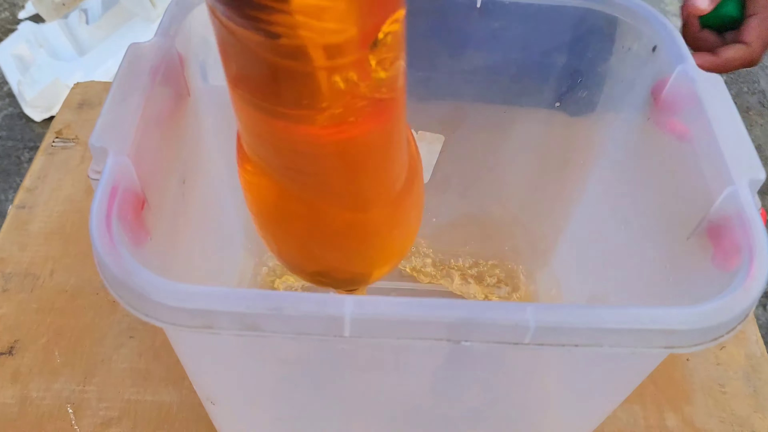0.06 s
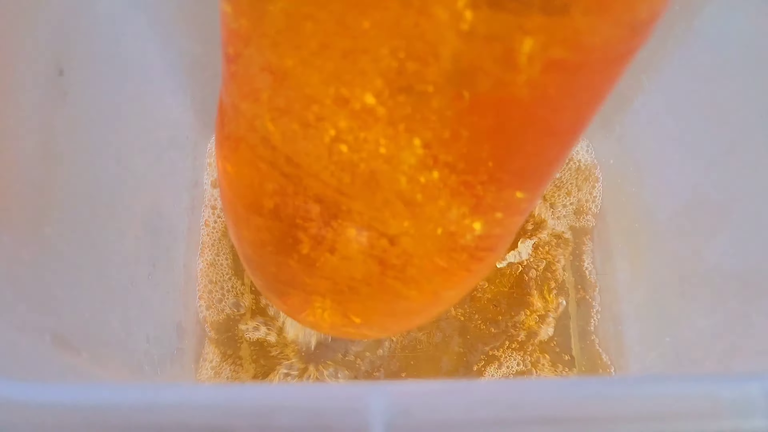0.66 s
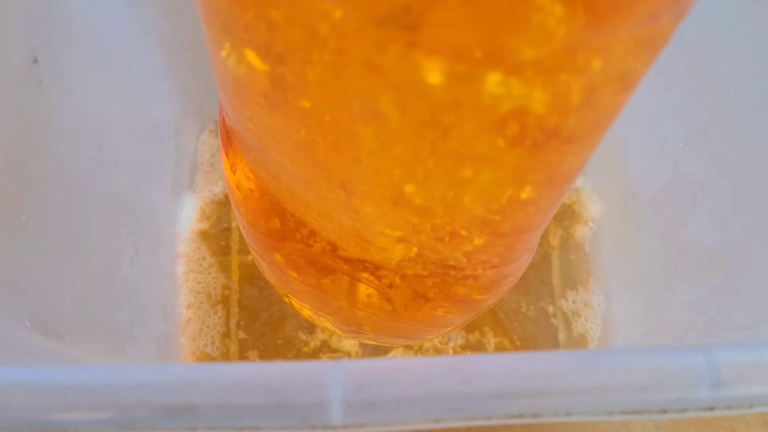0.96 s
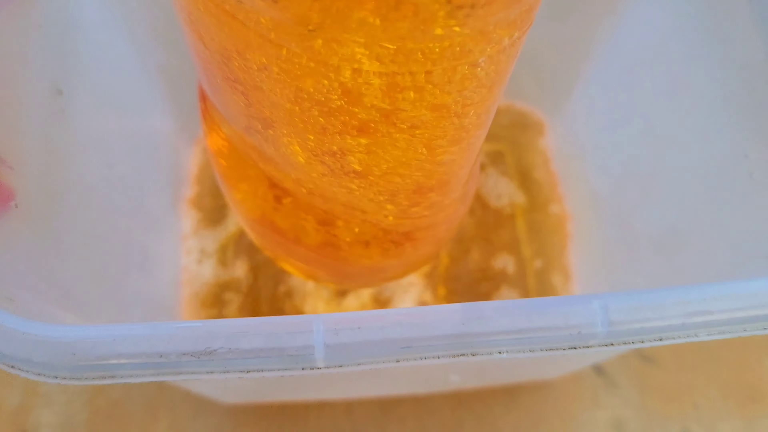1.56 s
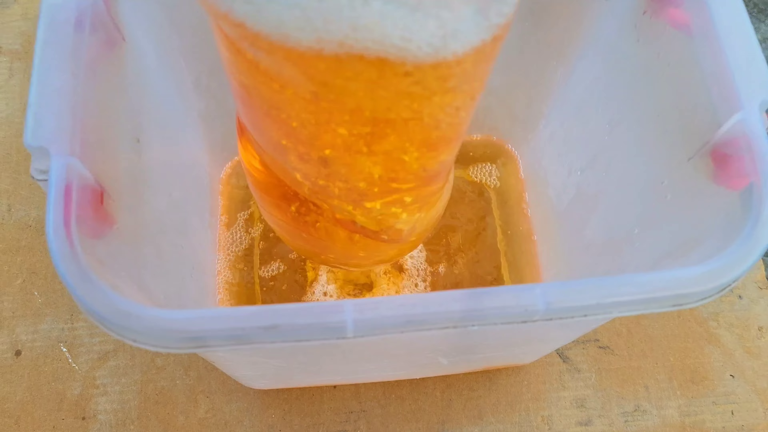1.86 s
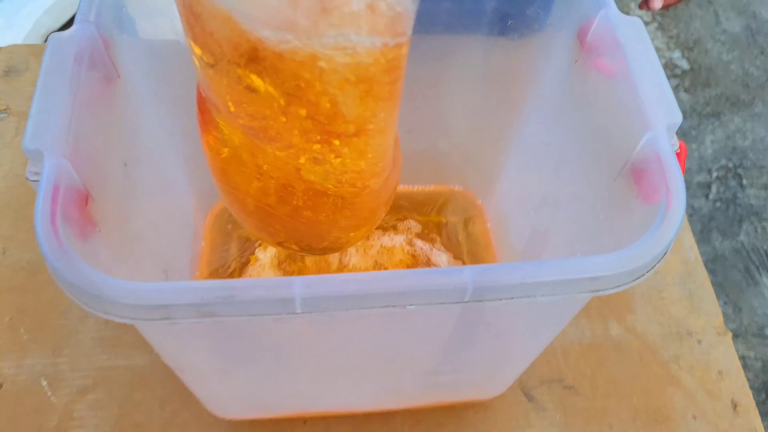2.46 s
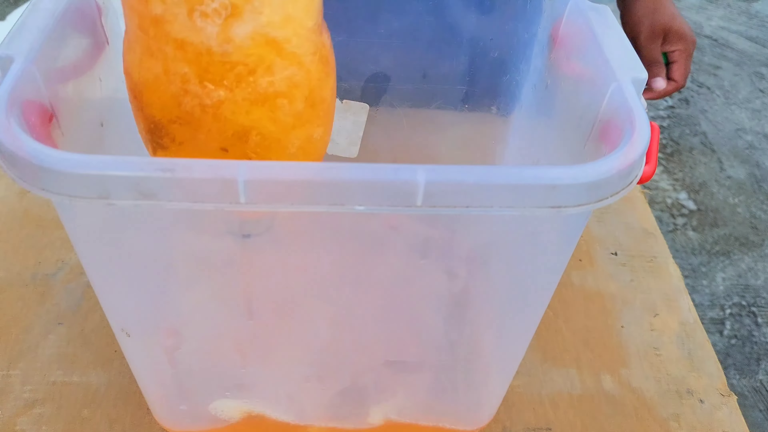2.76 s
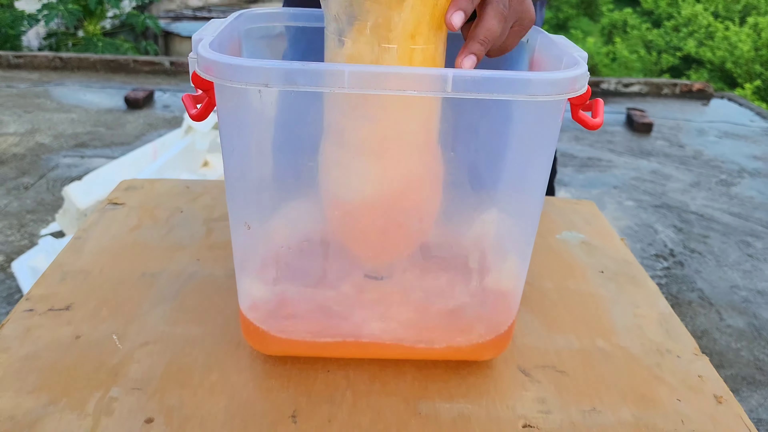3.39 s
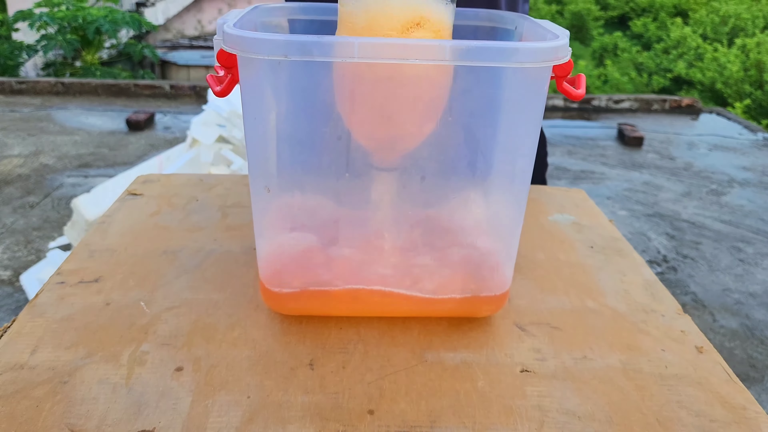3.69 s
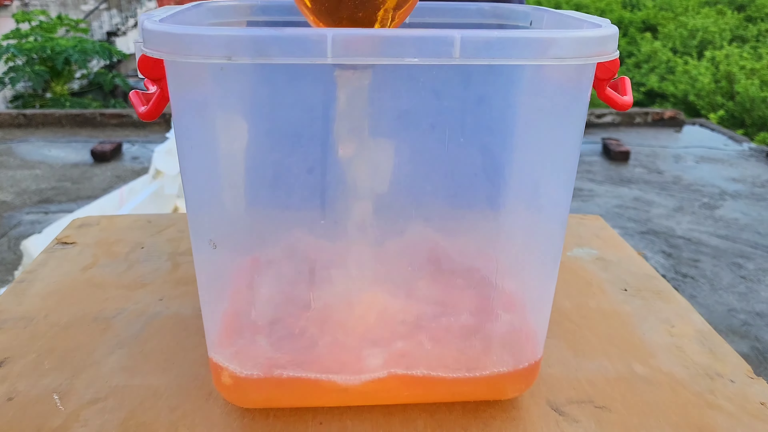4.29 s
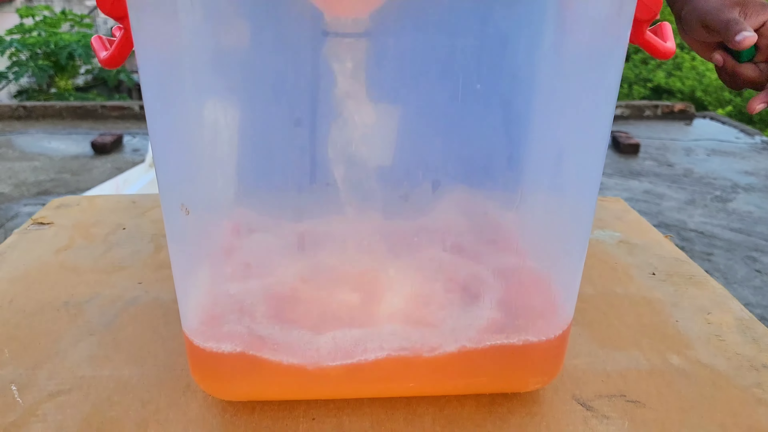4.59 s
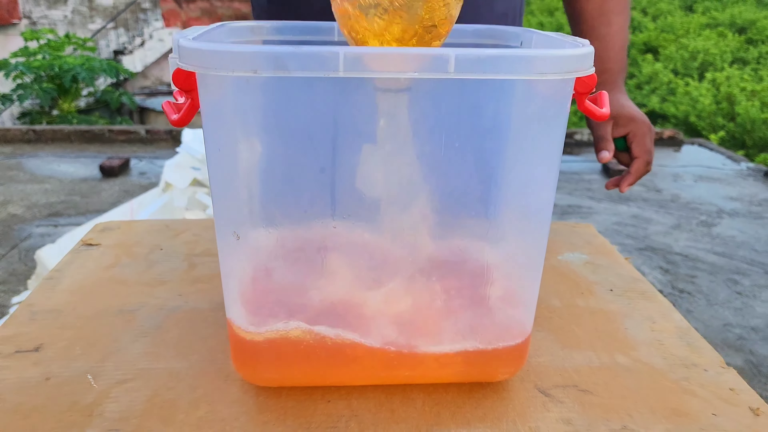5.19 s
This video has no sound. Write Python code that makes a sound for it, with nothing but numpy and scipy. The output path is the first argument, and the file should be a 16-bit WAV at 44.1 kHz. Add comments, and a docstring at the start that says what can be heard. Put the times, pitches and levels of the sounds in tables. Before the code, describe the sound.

Fingers rub, scrape and knock on the microphone while water pours quietly from a bottle into a plastic tub outdoors.

```python
"""On a flat roof, water pours from a plastic bottle into a plastic tub: drops splash and trapped air rings.
From the first moments a hand, much closer, rubs, scrapes and knocks on the plastic microphone case.
Friction and impact excite the case's damped modes, and the hardest knocks overload the input.
After three seconds the rubbing dies away; a few last knocks fall among the whistles of far birds.
The quiet pour remains, over the light breeze and far insects that have sounded throughout."""
import sys
import numpy as np
from scipy import signal
from scipy.fft import rfft, irfft, next_fast_len
from scipy.io import wavfile

SR = 44100
rng = np.random.default_rng(int(sys.argv[2]) if len(sys.argv) > 2 else 0)


def dump(signal):
    """Clip the signal to [-1, 1] and save it as 16-bit WAV at the path in sys.argv[1]."""
    limited = np.clip(np.atleast_2d(signal).T, -1, 1)
    pcm = np.round(limited * 32767).astype(np.int16)
    wavfile.write(sys.argv[1], SR, pcm)


N = 235670

# firm presses on the case: t/s, level/dB, f/Hz
PRESSES = [(0.253, -13.5, 110), (0.4992, -13.5, 126), (0.585, -4.5, 162), (0.658, -10, 287),
           (0.6737, -1, 240), (1.4484, -4.5, 233), (1.5866, -12, 315), (1.698, -12, 288),
           (1.7899, -9.5, 149), (1.8395, -15, 305), (2.0874, -20.5, 293), (2.187, -5, 188),
           (2.3655, -7, 315), (2.3964, -10.5, 190), (2.51, -0.5, 141), (2.5475, -1, 188), (2.6446, -8, 186),
           (2.656, -12, 203), (2.769, 2.5, 179), (2.917, -6.5, 181), (2.9743, -18, 144),
           (3.0484, -8.5, 222), (3.1319, -18.5, 147), (3.207, -24, 285), (3.2564, -22, 226),
           (3.5867, -8, 234), (3.771, -30.5, 308), (4.3032, -9.5, 200)]
# hard contacts: t/s, relative level/dB, tilt per band/dB, relative note level/dB, note f/Hz, left-right/dB
CONTACTS = [(0.157, -26, -8, -10, 563, 0.5), (0.577, -12.5, -0.5, -6, 783, 2.5),
            (0.67, -23.5, -6, -3, 602, 3.5), (0.697, -35, -4, -7.5, 745, 7),
            (0.791, -31, -1.5, -6.5, 3470, 2), (1.029, -31, 9.5, -18, 650, 4),
            (1.797, -9, 0.5, 3, 957, 0.5), (2.19, -23, -0.5, -16, 1780, 1),
            (2.353, -14, 6.5, -1.5, 400, 1.5), (2.51, -27, -2.5, 0.5, 748, 2.5),
            (2.554, -12.5, 1, 5, 476, 2), (2.656, -9.5, 1.3, -15, 2065, 9),
            (2.768, -17, -2.5, -9.5, 770, 1), (2.866, -20, -4, -8.5, 600, 4.5),
            (2.913, -13.5, -3, -4, 895, 1), (2.923, -22, 7.5, -16, 3940, 7.5),
            (3.048, -15.5, -3, -11, 464, 0.5), (3.109, -30, -7.5, -10.5, 533, 3),
            (3.553, -9, -1, 2.5, 900, -2.5), (3.586, -15.5, -1, -6, 1650, -2),
            (4.304, -5, 2.5, 2.5, 1470, -1.5)]
# ring of the case: f/Hz, relative density/dB
CASE_SPECTRUM = [(200, 7), (350, 1), (520, -1.5), (700, -2), (1000, 1), (1500, 11.5), (2200, 4.5),
                 (3200, 3), (4400, 4.5), (5500, -3), (7400, -7.5), (9500, -18), (12000, -26.5),
                 (15500, -31)]
# finger slips: t/s, relative level/dB, length/s, squeak f/Hz
FINGER_SLIPS = [(0.258, -25, 0.0043, 580), (0.319, -25, 0.01, 720), (1.0665, -18.5, 0.0027, 1230),
                (1.104, -23, 0.014, 1284), (1.141, -20, 0.016, 1223), (1.166, -25.5, 0.017, 750),
                (1.289, -21, 0.011, 280), (1.319, -23, 0.017, 1213), (1.354, -24.5, 0.0086, 1560),
                (1.363, -18.5, 0.0059, 2114), (1.539, -26.5, 0.0064, 1280), (1.563, -26, 0.0092, 1180),
                (1.586, -19, 0.0077, 1220), (1.846, -28, 0.0091, 1116)]
# resonances that the slips excite: f/Hz, nominal width/Hz, gain/dB
RASP_MODES = [(314, 140, 2.5), (724, 48, 4), (1236, 43, 7.5), (1880, 690, -7)]
# rumble and hiss of the rub: f/Hz, relative density/dB
RUMBLE_SPECTRUM = [(30, -32), (60, -3.5), (120, 2), (300, 1), (480, -11.5), (800, -5.5), (1500, -19.5),
                   (3000, -37)]
HISS_SPECTRUM = [(590, -20), (1000, -25), (1160, -7.5), (1750, -13.5), (2080, -6), (2740, -8.5), (3420, -2),
                 (4410, -12.5), (5760, -9.5), (6330, -9), (7270, -6.5), (9830, -17.5), (14600, -16.5),
                 (16000, -28)]
# light brushes over the case: t/s, level/dB, length/s
BRUSH_STROKES = [(.289, -27.5, 0.0031), (.385, -31, 0.025), (.5, -27, 0.012), (.615, -31, 0.057),
                 (1.493, -36, 0.011), (2.345, -36, 0.0095), (2.635, -34.5, 0.032), (2.652, -22, 0.0054),
                 (4.077, -39.5, 0.011), (4.185, -36, 0.021), (4.24, -39, 0.0061), (4.33, -43, 0.12),
                 (5.232, -41.5, 0.024)]
# the hand hesitates: t/s, depth/dB, length/s
HESITATIONS = [(0.92, 3.5, 0.14), (1.41, 9.5, 0.041), (2.04, 14, 0.087), (2.29, 0.5, 0.13),
               (2.82, 15, 0.11), (3.02, 4, 0.049)]
# water landing in the tub: f/Hz, relative density/dB
SPLASH_SPECTRUM = [(250, 0), (500, 3), (780, -16), (1150, 1.5), (1700, -7.5), (2500, -1.5), (3400, -3),
                   (4500, -6.5), (7000, -11.5), (10500, -17), (12000, -18), (15500, -16.5)]
# the stream thins: t/s, depth/dB, length/s
STREAM_LULLS = [(0.05, 11, 0.32), (3.75, 4.2, 0.73)]
# air over the microphone ports: f/Hz, relative density/dB
WIND_SPECTRUM = [(25, 0.5), (60, 0.5), (120, -1), (240, -9), (450, -18), (900, -15.5), (2000, -100)]
# gusts: t/s, level/dB, length/s
WIND_GUSTS = [(0.6, -28.5, 0.11), (2.58, -35.5, 0.33), (4.65, -44.5, 0.2), (5.28, -47, 0.13)]
# far birds: t/s, level/dB, length/s, starting f/Hz
WHISTLES = [(3.485, -43, 0.035, 2380), (3.676, -44, 0.045, 2590), (4.257, -48, 0.047, 2430),
            (4.827, -45, 0.059, 3630), (4.944, -40, 0.036, 3350)]
# likeness of the sound at the two ports: f/Hz, correlation
PORT_CORRELATION = [(100, .99), (300, 0.93), (600, 0.83), (1100, -0.12), (2500, -0.15), (5000, -0.32),
                    (12000, 0.048)]
# close sounds reach the ports unequally: f/Hz, left-right/dB
PORT_BALANCE = [(150, .5), (600, 0.5), (1200, 1.5), (2300, -0.5), (4000, -4.5), (7500, -5), (12000, 0.5)]

RUB_PEAK_S, RUB_PEAK_DB, LET_GO_S = 0.49, -31, 3.15
BEAR_DOWN = (0.66, -30, 0.12)  # the hand bears down, swelling the rumble: t/s, level/dB, length/s


def knocks(t60=0.023, rise_s=0.0025, crack_db=10.0, tail_db=-34):
    """Impact excites the case's crowded, damped modes; one note, set by the spot struck, stands out."""
    out, t = np.zeros((2, N)), np.arange(SR // 8) / SR
    crack = from_db(crack_db) * struck(t, rise_s, t60=0.0047)
    tail = from_db(tail_db) * struck(t, rise_s, t60=0.15)
    for s, level, tilt, note_db, note_hz, pan_db in CONTACTS:
        ring = coloured(rng.standard_normal((2, len(t))), CASE_SPECTRUM)
        note_t60 = 0.035 * (1000 / note_hz) ** 0.38  # higher notes die sooner
        note_envelope = struck(t, rise_s=0.00022, t60=note_t60) * from_db(note_db - 9.5)
        sound = np.sin(2 * np.pi * note_hz * t) * note_envelope
        for edges_hz, db, band_t60 in [([420, 1500], 13.5 - tilt, t60),  # body
                                       ([1500, 5000], 16.0, t60),  # clack
                                       ([5500, 8800], 13.5 + tilt, 0.76 * t60),  # snap
                                       ([10000, 15500], 2.5 + 2 * tilt, 0.76 * t60)]:  # sizzle
            decay = struck(t, rise_s, band_t60)
            modes = rms_one(band(ring, edges_hz, "band") * (crack + decay + tail))
            # the energy of a blow is set by its strength and its ring time
            sound = sound + modes * from_db(level + db) * np.sqrt(np.mean(decay ** 2))
        add(out, s, sound * panned(pan_db))
    return out


def thumps(effort_db, rise_s=0.0009, t60_at_0_db=0.028, halving_db=31):
    """Damped oscillation: the dented case swings back, and a firmer hand damps it sooner."""
    out, t = np.zeros(N), np.arange(SR // 6) / SR
    for s, db, hz in PRESSES + light_presses(effort_db, count=12):
        t60 = t60_at_0_db * .5 ** (db / halving_db)
        add(out, s, -np.sin(2 * np.pi * hz * t) * struck(t, rise_s, t60) * from_db(db))
    return out


def light_presses(effort_db, count, above_rub_db=12.5, centre_hz=218):
    """Random shifts of grip excite the case in proportion to the rub: t/s, level/dB, f/Hz."""
    when = (np.arange(count) + rng.random(count)) / count * LET_GO_S
    hz = centre_hz * 2 ** (rng.random(count) - .5)
    return list(zip(when, effort_db[(when * SR).astype(int)] + above_rub_db, hz))


def slips(rasp_db=-5.0, squeak_db=-4.5, squeak_width_hz=110, pan_db=5.0):
    """Stick-slip friction: a finger's quick catches drive resonances, a hollow rasp with a squeak."""
    rows = FINGER_SLIPS + drag(count=5)
    catches = grains(per_s=1700, spread_db=-0.5)
    mid, side = sum(from_db(db) * resonate(catches, hz, 2 * width) for hz, width, db in RASP_MODES)
    rasp = rms_one(mid + .5 * side * np.array([[1], [-1]]))
    out = rasp * swells([row[:3] for row in rows]) * from_db(rasp_db)
    for s, db, length, hz in rows:
        bell = np.hanning(int(np.pi * length * SR))
        squeak = resonate(rng.standard_normal(SR // 4), hz, squeak_width_hz)[-len(bell):]
        add(out, s - len(bell) / SR / 2, rms_one(squeak * bell) * bell.mean() * from_db(db + squeak_db))
    return out * panned(pan_db)


def drag(count, start_s=1.045, end_s=1.25, db=-28.5, length_s=0.025, hz=746, jitter_s=0.00476):
    """Relaxation oscillation: a dragging finger slips almost evenly; rows as in FINGER_SLIPS."""
    times = np.linspace(start_s, end_s, count)
    chance = rng.uniform(-1.03, 1, (count, 2))
    return [(s + jitter_s * late, db, length_s, hz * (1 + 0.07 * sharp))
            for s, (late, sharp) in zip(times, chance)]


def rubbing(effort_db, rumble_db=-1.5, rumble_follows=0.79, snag_db=-7.0):
    """Sliding friction: skin shakes the case in low lumps and hisses in fine grains, with a few snags."""
    rumble_gain = from_db(RUB_PEAK_DB + rumble_follows * (effort_db - RUB_PEAK_DB) + rumble_db)
    rumble = coloured(rng.standard_normal((2, N)) * lumps(rate_hz=27, depth_db=3.5), RUMBLE_SPECTRUM)
    grit = rms_one(grains(per_s=12000, spread_db=0.0) * lumps(rate_hz=71, depth_db=3.0))
    snags = from_db(snag_db) * grains(per_s=98, spread_db=2.0)
    hiss = patchy(coloured(grit + snags, HISS_SPECTRUM), rate_hz=40, depth_db=4.0)
    hiss_gain = from_db(effort_db) + swells(BRUSH_STROKES)
    return rumble * (rumble_gain + swells([BEAR_DOWN])) + hiss * hiss_gain


def rub_effort(rise_db_per_s=22, ease_db_per_s=4.5, release_db_per_s=54):
    """The drive of the friction, in dB: a quick rise, a long easing with hesitations, then release."""
    t = np.arange(N) / SR
    arc = np.minimum(rise_db_per_s * (t - RUB_PEAK_S), ease_db_per_s * (RUB_PEAK_S - t))
    release = release_db_per_s * np.maximum(t - LET_GO_S, 0)
    return RUB_PEAK_DB + arc - release - lulls(HESITATIONS)


def pour(flow_db=-48, spray_db=3.5, trickle_db=-1.5, drip_db=-8.5):
    """Drop impact and bubble resonance: the stream splashes and trickles, and a few drips ring out."""
    impacts = grains(per_s=6700, spread_db=-2.0)
    spray = patchy(coloured(impacts, SPLASH_SPECTRUM, close=False), rate_hz=37, depth_db=4.5)
    trickle = bubbles(count=2000, spread_db=3.2, low_hz=833, high_hz=4200)
    drips = bubbles(count=120, spread_db=4.5, low_hz=1397, high_hz=4400)
    flow = from_db(flow_db - lulls(STREAM_LULLS)) * lumps(rate_hz=13, depth_db=1.0)
    return flow * (from_db(spray_db) * spray + from_db(trickle_db) * trickle + from_db(drip_db) * drips)


def bubbles(count, spread_db, low_hz, high_hz, t60_cycles=38):
    """Bubble resonance: trapped air is a spring, water its mass; each note rises a little as it dies."""
    out, t = np.zeros((2, N)), np.arange(SR // 30) / SR
    for when, pitch, loud, place in np.c_[rng.random((count, 2)), rng.standard_normal((count, 2))]:
        hz = low_hz * (high_hz / low_hz) ** pitch
        age = t * hz / t60_cycles
        phase = 2 * np.pi * hz * t * (1 + .02 * np.minimum(age, 2))
        tone = np.sin(phase) * np.exp(-np.log(1000) * age)
        add(out, when * N / SR, tone * from_db(spread_db * np.clip(loud, -2, 2)) * panned(2 * place))
    return rms_one(out)


def breeze(calm_db=-48, flutter_db=2.0):
    """Turbulent pressure: light air rumbles over the ports and swells in gusts."""
    eddies = rng.standard_normal((2, N)) * from_db(flutter_db * drift(rate_hz=17.0))
    return (from_db(calm_db) + swells(WIND_GUSTS)) * coloured(eddies, WIND_SPECTRUM)


def insects(level_db=-55):
    """Incoherent addition: far insects merge into one high band of noise."""
    chorus = resonate(rng.standard_normal((2, N)), hz=5280, width_hz=650)
    return from_db(level_db) * rms_one(chorus) * lumps(rate_hz=1.9, depth_db=0.5)


def birds(sag_hz_per_s=2000, waver=0.011):
    """Frequency modulation: each short whistle sags and wavers in pitch."""
    out = np.zeros(N)
    for s, db, length, start_hz in WHISTLES:
        size = int(length * SR)
        glide_hz = start_hz - sag_hz_per_s * np.arange(size) / SR
        hz = glide_hz * (1 + waver * drift(rate_hz=120)[:size])
        add(out, s, from_db(db) * np.hanning(size) * np.sin(2 * np.pi * np.cumsum(hz) / SR))
    return out


def struck(t, rise_s, t60):
    """Exponential decay after a quick rise: the envelope of a blow."""
    return (1 - np.exp(-t / rise_s)) * np.exp(-np.log(1000) * t / t60)


def resonate(x, hz, width_hz):
    """Resonance: two like stages in cascade, each width_hz wide, give steep skirts and a peak gain of 1."""
    r = np.exp(-np.pi * width_hz / SR)
    b, a = np.array([1, 0, -1]) * (1 - r * r) / 2, [1, -2 * r * np.cos(2 * np.pi * hz / SR), r * r]
    return signal.lfilter(b, a, signal.lfilter(b, a, x))


def grains(per_s, spread_db):
    """Shot noise: random tiny impacts of uneven size, heard at both ports."""
    born = rng.random(N) < per_s / SR
    size = from_db(spread_db * np.minimum(rng.exponential(1, N), 4))
    return rms_one(born * size * rng.standard_normal((2, N)))


def coloured(pair, spectrum, close=True):
    """Partial coherence: two unrelated signals become stereo of this spectrum, alike in the bass."""
    size = next_fast_len(pair.shape[1])
    hz = np.arange(size // 2 + 1) * SR / size
    mid, side = rfft(pair, size) * from_db(at_hz(spectrum, hz))
    alike = np.clip(at_hz(PORT_CORRELATION, hz), -1, 1)
    both = np.sqrt(1 + alike) * mid + np.sqrt(1 - alike) * side * [[1], [-1]]
    balance = panned(at_hz(PORT_BALANCE, hz) * close)
    return rms_one(irfft(both * balance, size)[:, :pair.shape[1]])


def patchy(x, rate_hz, depth_db, count=7):
    """Independent modulation: neighbouring bands swell and fade, each on its own."""
    size = next_fast_len(N)
    hz, spectrum = np.arange(size // 2 + 1) * SR / size, rfft(x, size)
    centres = np.geomspace(600, 12000, count)
    bands = (irfft(spectrum * at_hz(np.c_[centres, share], hz), size)[:, :N] for share in np.eye(count))
    return rms_one(sum(part * lumps(rate_hz, depth_db) for part in bands))


def lumps(rate_hz, depth_db):
    """Random amplitude modulation: a gain that wanders within soft limits."""
    return from_db(depth_db * 1.5 * np.tanh(drift(rate_hz) / 1.5))


def drift(rate_hz):
    """Low-pass noise: a smooth fluctuation of unit rms."""
    r = np.exp(-40 * np.pi * rate_hz / SR)  # pole at one twentieth of the sample rate
    slow = signal.lfilter([1], [1, -2 * r, r * r], rng.standard_normal(N // 20 + 2002))[2000:]
    return np.interp(np.arange(N) / 20, np.arange(len(slow)), rms_one(slow))


def swells(rows):
    """Addition of powers: bell-shaped strokes join into one amplitude envelope."""
    power = np.zeros(N)
    for s, db, length in rows:
        t = np.arange(-1.5 * length, 1.5 * length, 1 / SR)
        add(power, s + t[0], from_db(db) ** 2 * np.exp(-(2 * t / length) ** 2))
    return np.sqrt(power)


def lulls(rows):
    """Attenuation in bell-shaped dips, in dB."""
    t = np.arange(N) / SR
    return sum(db * np.exp(-(2 * (t - s) / length) ** 2) for s, db, length in rows)


def band(x, edges_hz, kind):
    """Causal filtering with a maximally flat passband."""
    return signal.sosfilt(signal.butter(2, edges_hz, kind, fs=SR, output="sos"), x)


def at_hz(points, hz):
    """Interpolation on a log-frequency axis."""
    points = np.array(points)
    return np.interp(np.log(np.maximum(hz, 1)), np.log(points[:, 0]), points[:, 1])


def panned(db):
    """Level difference as left and right gains."""
    return from_db(np.array([db, -db]).reshape(2, -1) / 2)


def add(out, s, sound):
    """Superposition of a short sound at time s."""
    i = max(round(s * SR), 0)
    out[..., i:i + sound.shape[-1]] += sound[..., :N - i]


def from_db(db):
    """Amplitude ratio of a level in decibels."""
    return 10 ** (np.asarray(db) / 20)


def rms_one(x):
    """Normalisation to unit rms."""
    return x / np.sqrt(np.mean(x ** 2) + 1e-20)


def scene():
    """Superposition: close handling over the pour and the open country."""
    effort_db = rub_effort()
    handling = thumps(effort_db) + knocks() + slips() + rubbing(effort_db)
    return handling + pour() + breeze() + insects() + birds()


def record(dry, low_cut_hz=36, high_cut_hz=16300):
    """Band limiting and saturation: deep bass is cut, hard knocks overload the input, the top is cut."""
    x = band(dry, low_cut_hz, "high")
    clipped = x / (1 + x ** 8) ** (1 / 8)
    return signal.sosfilt(signal.ellip(10, .1, 80, high_cut_hz, fs=SR, output="sos"), clipped)


dry = scene()
out = record(dry)
dump(out)
```